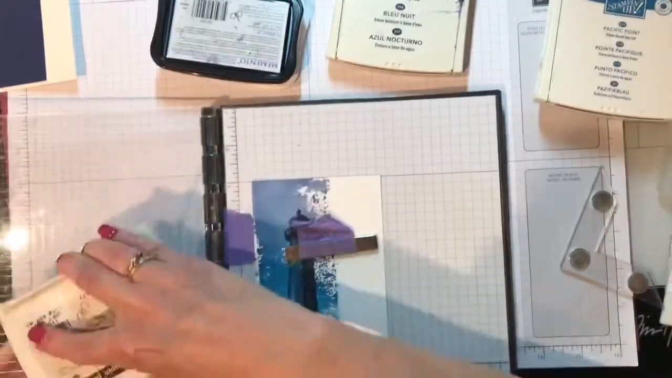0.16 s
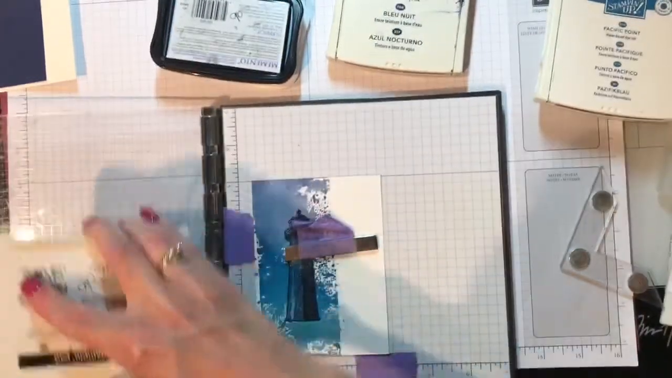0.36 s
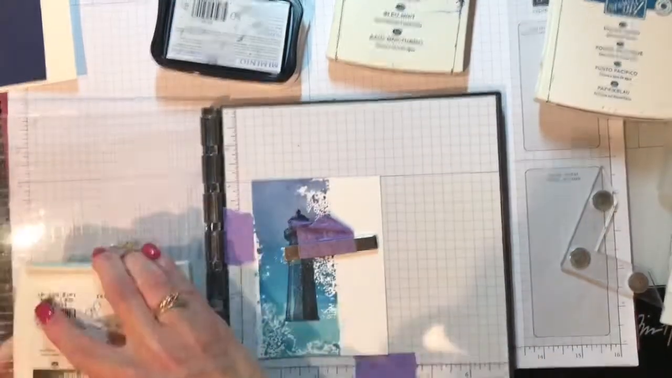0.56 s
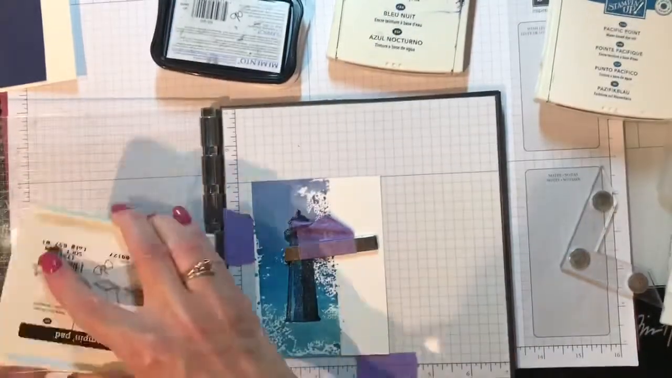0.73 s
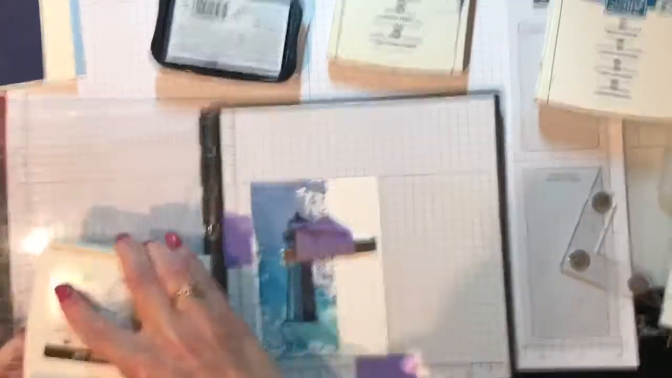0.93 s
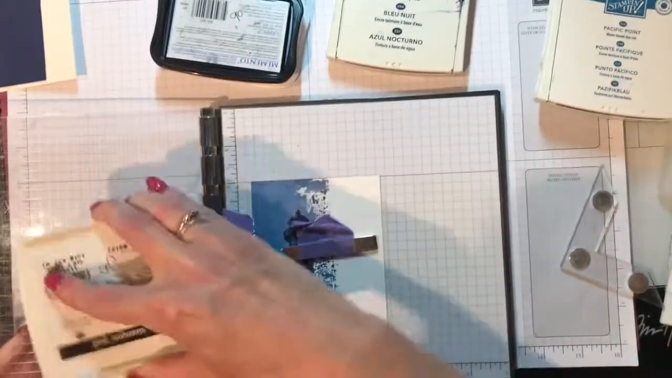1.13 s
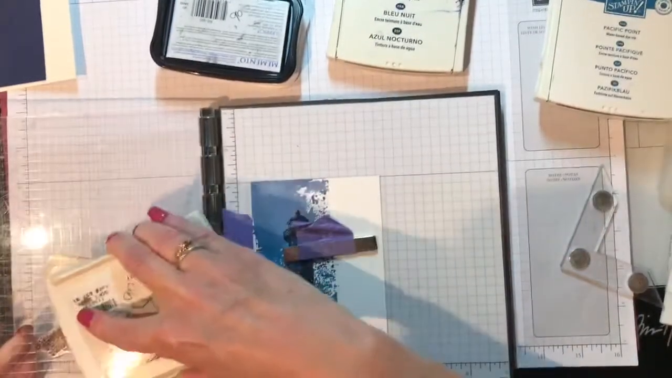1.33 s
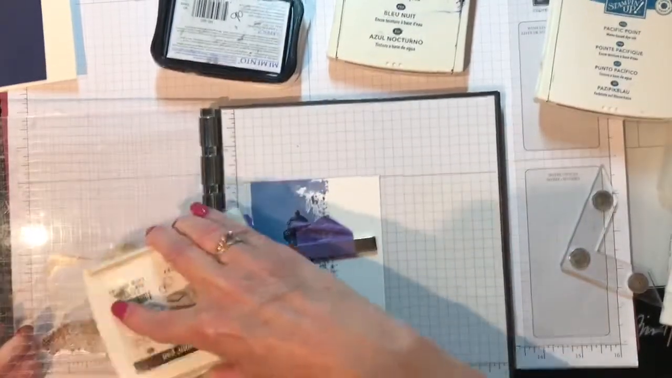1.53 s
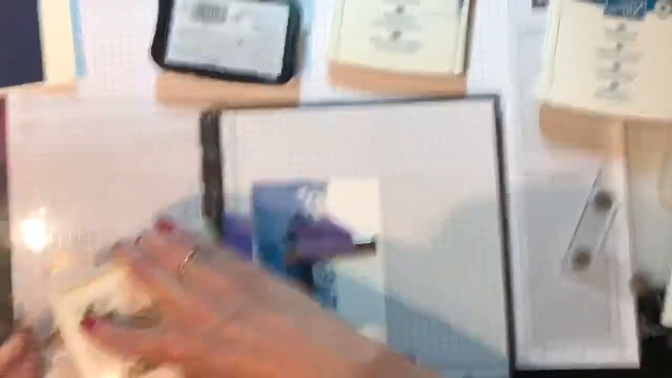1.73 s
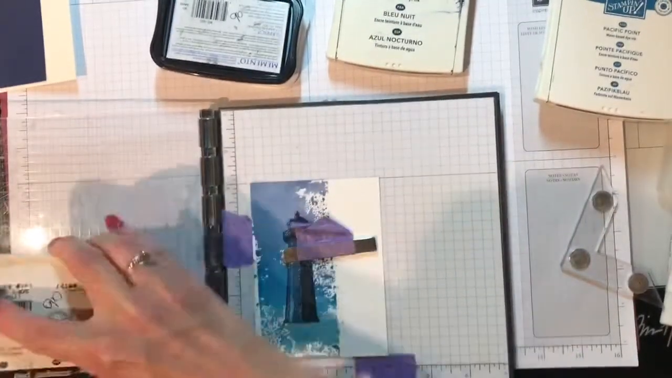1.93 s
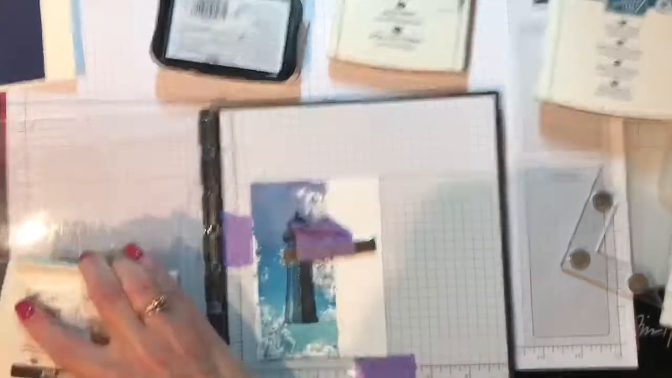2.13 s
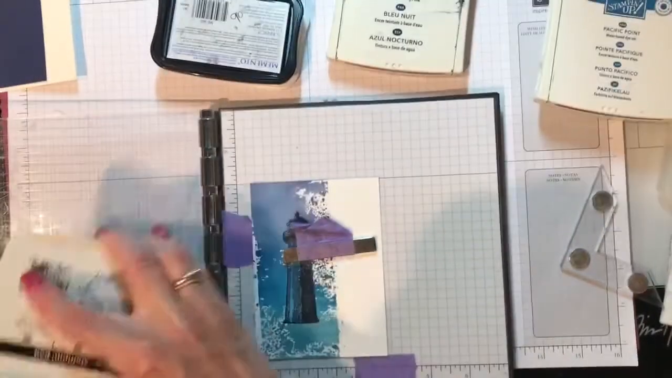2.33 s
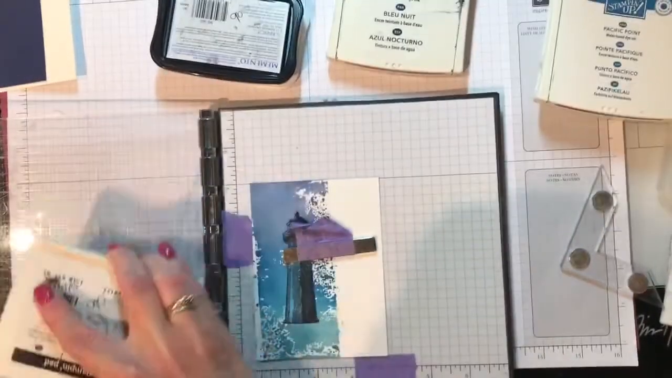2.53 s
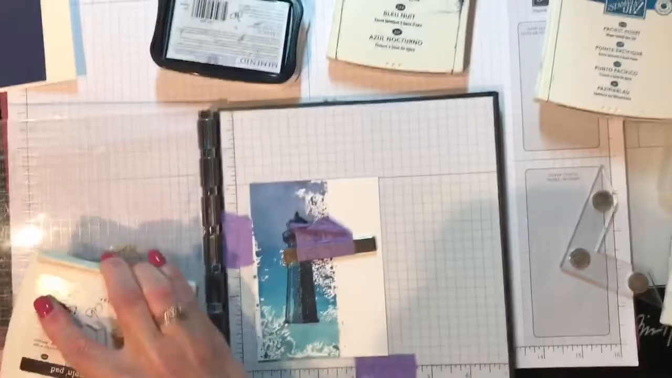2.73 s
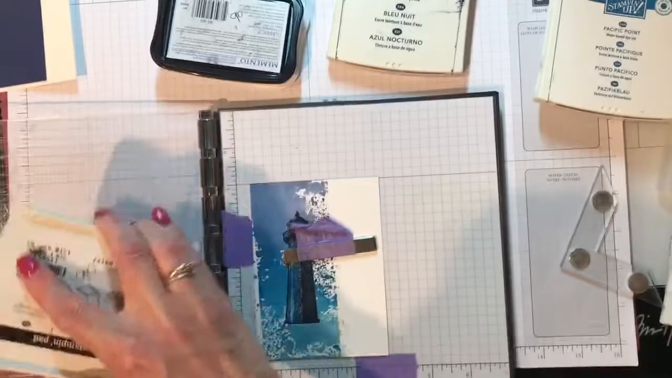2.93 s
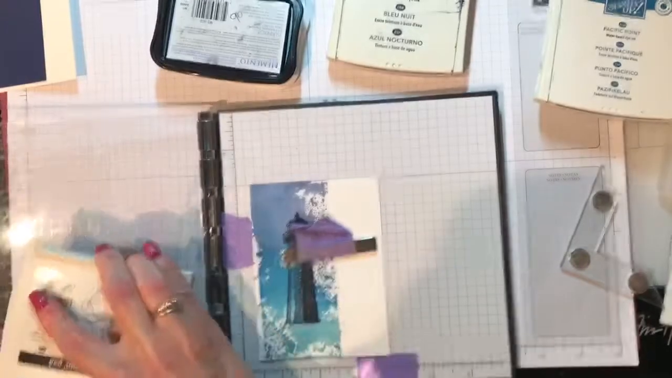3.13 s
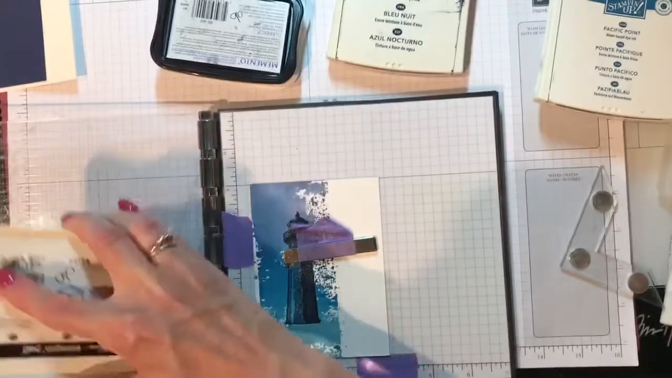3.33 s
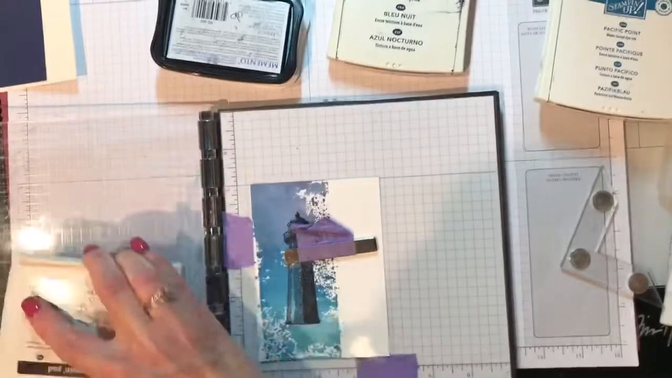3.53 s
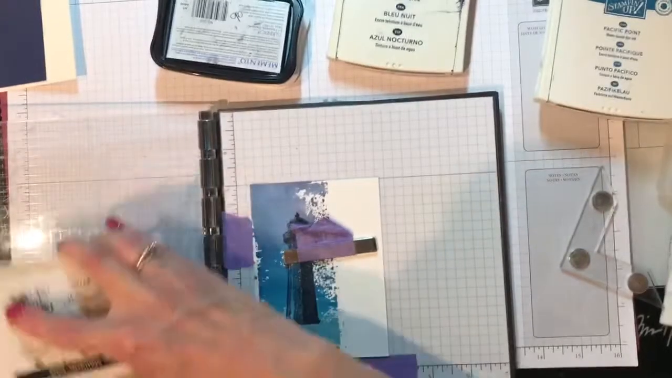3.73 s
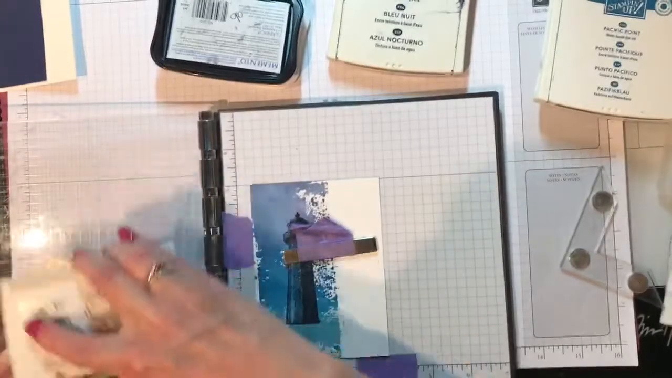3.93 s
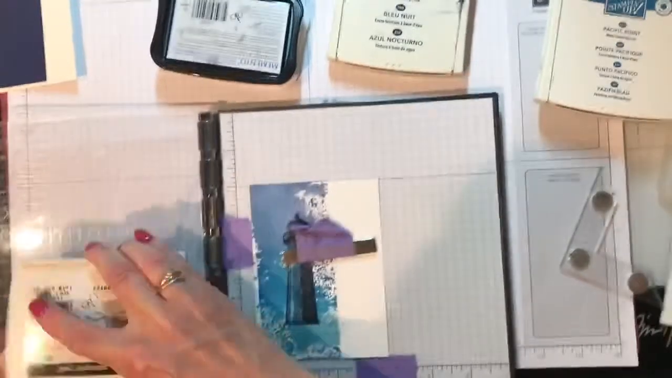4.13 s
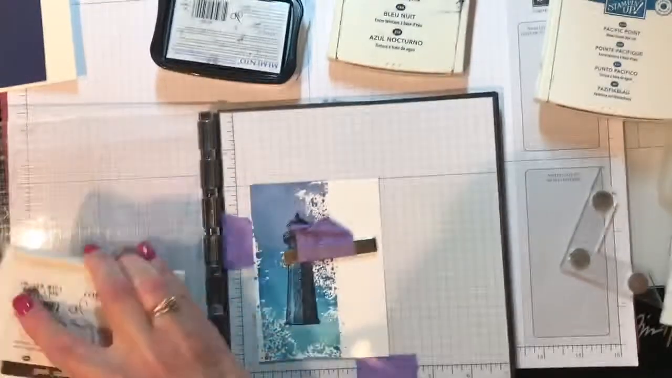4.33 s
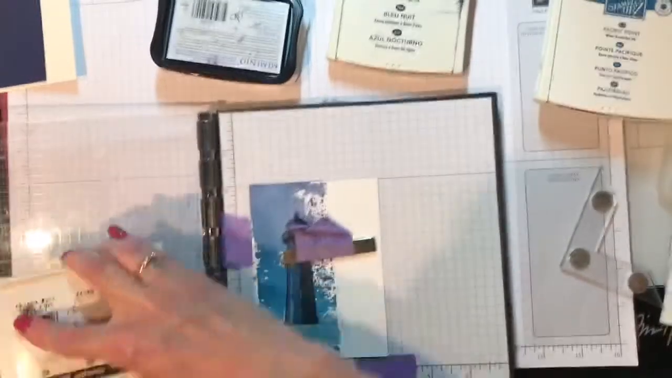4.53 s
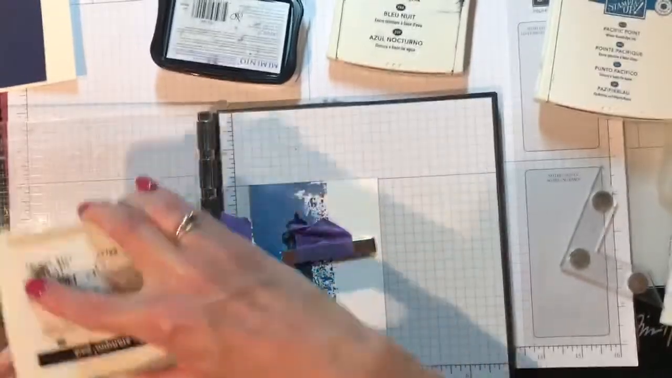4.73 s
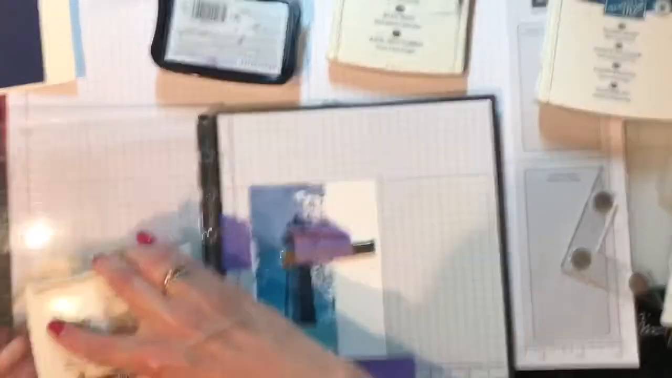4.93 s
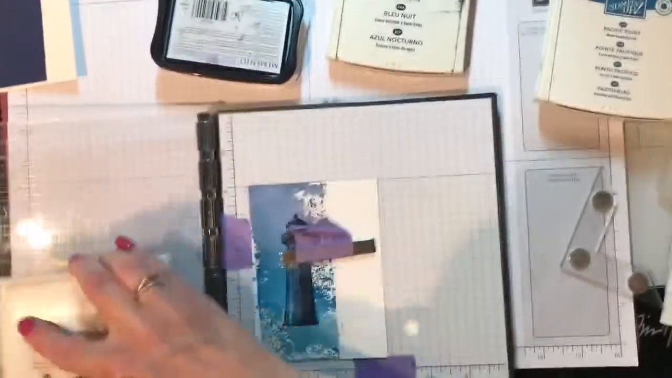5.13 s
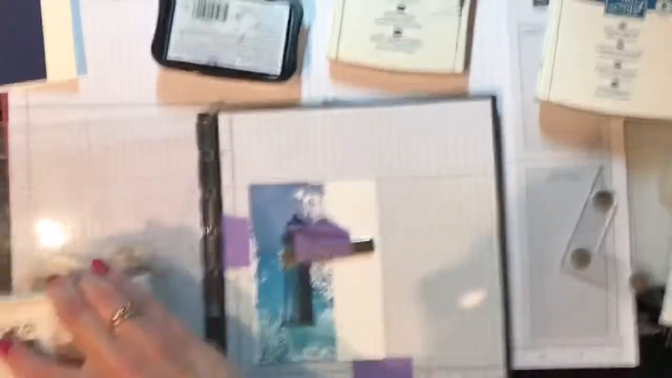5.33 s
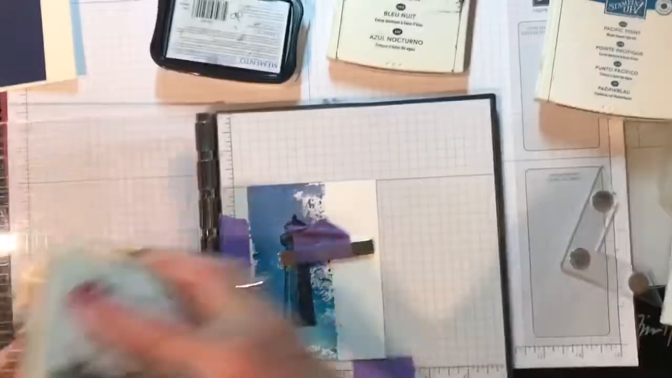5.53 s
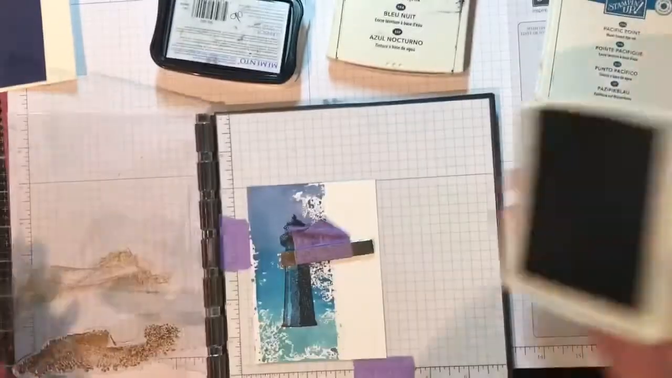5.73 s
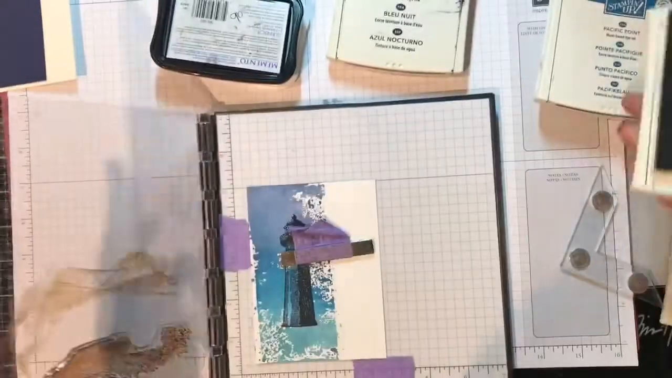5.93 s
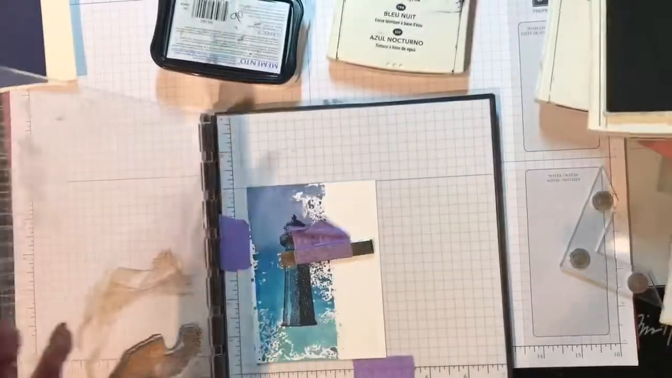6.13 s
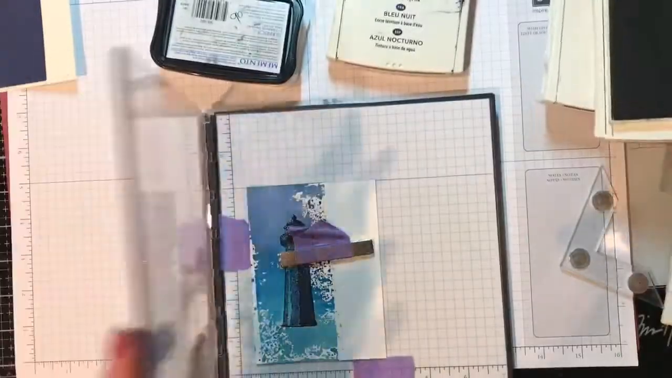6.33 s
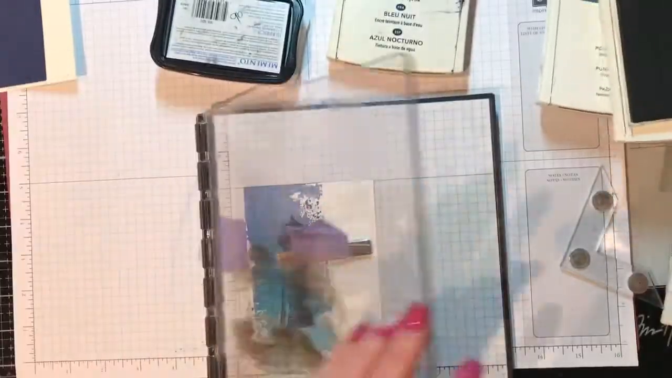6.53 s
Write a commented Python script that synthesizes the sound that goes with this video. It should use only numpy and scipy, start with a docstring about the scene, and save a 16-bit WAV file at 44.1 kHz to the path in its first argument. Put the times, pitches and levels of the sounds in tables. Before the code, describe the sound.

Dry, woody-plastic dabs of varying strength come at an irregular, brisk pace, heard from a close microphone. The loose plate chatters after each contact, the tabletop gives a soft thud and the tacky pad lets go with a tiny rough breath of noise. After the last strong hits there is near quiet with light brushing, then a knock, a smaller bright click and a dull swish. A weak wavering hum and soft air lie below.

```python
"""Ink pad dabbed on a stamp

Close on a table, a plastic ink pad is dabbed again and again onto a stamp fixed to a hinged clear plate.
Each dab rings the plate's modes, thumps the table, sends a click into a noise tail of the room and peels off
as rough noise. Short dry contacts make the loose plate tick and rattle between dabs.
Strokes of a hand and the swinging plate are grainy noise; a wavering hum and room noise lie below.
"""
import sys
import numpy as np
from scipy import signal
from scipy.fft import rfft, irfft, next_fast_len
from scipy.io import wavfile
from scipy.ndimage import uniform_filter1d

SR = 44100
rng = np.random.default_rng(int(sys.argv[2]) if len(sys.argv) > 2 else 0)


def put_to_file(sound):
    """Save the sound as 16-bit audio at rate SR, in the file named by the first command-line argument."""
    columns = np.atleast_2d(sound).T  # one column per channel
    safe = np.clip(columns, -1, 1)
    whole_steps = np.round(safe * 32767)
    wavfile.write(sys.argv[1], SR, whole_steps.astype(np.int16))


N = 289737   # length in samples

# Blows of the pad. Each row: start in seconds, peak level in dB, main plate ring in Hz, crack setting against
# the ring in dB, contact time scale in ms, table thump setting in dB, rebound against the blow in dB,
# peel setting in dB, boost of the hollow low knock in dB.
BLOWS = [(-.002, -11.5, 996, -12.5, 5.3, -34.5, -18, -35, 5.5),
         (.443, -14.5, 1280, -11.5, 2.8, -56, -16, -65, 0),
         (.454, -3.5, 1190, -7.5, 0.77, -35.5, -25, -51, 3.5),
         (.869, -9.5, 1244, -11.5, 3.2, -32, -4.5, -37, -4), (1.24, -14.5, 1140, -8, 4.1, -34, -14, -58, 0),
         (1.481, -17.5, 1318, -15.5, 2.35, -34, -31, -51.5, -2.5),
         (1.688, -16.5, 1347, -11.5, 2.66, -38.5, -21, -37, 7),
         (2.049, -11, 1220, -9, 3.54, -32.5, -33, -37.5, 3.5),
         (2.568, -14, 1300, -4.5, 2.4, -53, -19, -45.5, -10),
         (2.573, -11, 1240, -19, 0.78, -37.5, -24, -48.5, -1),
         (3.022, -8.5, 1426, -1.5, 2.75, -33.5, -12.5, -40.5, -3.5),
         (3.511, -17.5, 1077, -16.5, 3, -35.5, -23, -49.5, -3),
         (3.518, -15, 1330, -10.5, 2, -62, -28, -54.5, -15),
         (3.957, -8, 1190, -2.5, 2.7, -34, -11.5, -35.5, -2),
         (4.372, -9.5, 1227, -2.5, 3.3, -38, -15, -40, 8),
         (4.865, -11.5, 1188, -26.5, 3.06, -35, -32, -35, 1.5),
         (5.147, -2.5, 1235, -0.5, 2.36, -32, -12.5, -33, 4.5),
         (5.312, -21, 980, -11, 5, -34.5, -23, -35, 6),
         (6.112, -12, 1690, -6.5, 5.17, -44, -17, -65.5, 3.5),
         (6.287, -19, 3500, -7.5, 3, -67, -30, -64, 5)]


def amp(db):
    """Turn dB into gain."""
    return 10 ** (np.asarray(db) / 20)


def rms_one(x):
    """Scale to unit rms."""
    return x / np.sqrt(np.mean(x ** 2) + 1e-20)


def at_hz(hz, value, wanted):
    """Read a table on a log-frequency axis."""
    return np.interp(np.log(wanted), np.log(hz), value)


def ring(x, hz, t60):
    """A damped resonance: a unit click sets a sine of starting height 1 ringing for t60 seconds."""
    radius = amp(-60 / (t60 * SR))
    angle = 2 * np.pi * hz / SR
    feedback = [1, -2 * radius * np.cos(angle), radius * radius]
    return signal.lfilter([0, np.sin(angle)], feedback, x + 1e-18)


def coloured(spectrum):
    """Steady noise with the given spectrum, rms 1."""
    size = next_fast_len(N)
    hz = np.arange(size // 2 + 1) * SR / size + 1   # the 1 keeps the logarithm finite
    gain = amp(at_hz(*np.transpose(spectrum), hz))
    white = rng.standard_normal(size)
    return rms_one(irfft(rfft(white) * gain, size)[:N])


def grainy(spectrum, rough_db):
    """Friction-like coloured noise whose level jumps every few ms, with a few sharp grains; rms 1."""
    jumps = rms_one(uniform_filter1d(rng.exponential(1, N) ** 2, size=130) - 2)   # 2 is the mean
    return rms_one(amp(rough_db * jumps) * coloured(spectrum))


def add(track, sound, s):
    """Mix a sound in at a time; it may have begun before zero."""
    i = round(s * SR)
    sound = sound[max(-i, 0):len(track) - i]
    track[max(i, 0):max(i, 0) + len(sound)] += sound


def air():
    """Room noise whose rumble swells and sinks a few times a second."""
    level_db, rumble_wavers_db = -61, 3
    # Room noise. Each row: frequency in Hz, density in dB per Hz.
    air_colour = [(20, -17), (40, -2.5), (65, 4), (100, 8), (150, -16.5), (200, -6), (620, -13),
                  (1100, -12), (2500, -17), (6900, -28.5), (10400, -33), (14800, -29.5), (16500, -35)]
    noise = coloured(air_colour)
    low = signal.sosfiltfilt(signal.butter(2, 140, fs=SR, output="sos"), noise)
    smooth = uniform_filter1d(rng.standard_normal(N), size=6000)
    waver = rms_one(uniform_filter1d(smooth, size=6000))
    return amp(level_db) * (noise - low + low * amp(rumble_wavers_db * waver))


def hum():
    """A motor tone: a sine whose level and phase waver together."""
    hum_hz, level_db = 119, -60
    waver = rms_one(uniform_filter1d(rng.standard_normal(N), size=4000))
    phase = 2 * np.pi * hum_hz * np.arange(N) / SR + 0.14 * waver
    return amp(level_db + 2.5 * waver) * np.sin(phase)


def burst(crack_db):
    """What a contact throws into the room: a click, duller when the crack is weak."""
    dull = np.clip(-crack_db / 45, 0, .9)
    return (1 - dull) * dull ** np.arange(64)


def room(x):
    """The room answers with a noise tail that dies band by band."""
    # Room tail. Each row: frequency in Hz, level at the start in dB, t60 in seconds.
    room_bands = [(204, -33, 0.25), (483, -31.5, 0.24), (1370, -28, 0.43), (1810, -26.5, 0.33),
                  (2650, -26, 0.27), (5340, -27.5, 0.29), (9000, -30.5, 0.32), (15000, -31, 0.041)]
    hz, db, t60 = np.transpose(room_bands)
    t = np.arange(round(.6 * SR)) / SR
    response = np.zeros(len(t))
    edges = 100 * 2 ** np.arange(0, 7.6, .5)   # half-octave bands
    white = rng.standard_normal((2, len(t)))   # neighbouring bands use different noise
    for k, (low, high) in enumerate(zip(edges, edges[1:])):
        centre = np.sqrt(low * high)
        band_pass = signal.butter(2, [low, high], "band", fs=SR, output="sos")
        band = rms_one(signal.sosfilt(band_pass, white[k % 2]))
        response += band * amp(at_hz(hz, db, centre) - 60 * t / at_hz(hz, t60, centre))
    build_up = 1 - np.exp(-t / 0.00039)
    return signal.fftconvolve(x, response * build_up)[:N]


def resonant(x):
    """Tails and friction pass through a few fixed resonances."""
    # Fixed resonances. Each row: frequency in Hz, boost above the rest in dB, width in Hz.
    resonances = [(1010, 7, 94), (1200, 4, 90), (2480, 6, 96), (3626, 4, 160), (4345, 3.5, 150),
                  (6930, 5, 100)]
    out = x.copy()
    for hz, db, width_hz in resonances:
        r = np.exp(-np.pi * width_hz / SR)
        feedback = [1, -2 * r * np.cos(2 * np.pi * hz / SR), r * r]
        band = signal.lfilter((1 - r * r) / 2 * np.array([1, 0, -1]), feedback, x)
        out += (amp(db) - 1) * band
    return amp(-1.5) * out


def brushing():
    """Grainy friction noise: each stroke swells, holds and fades as a dull scuff and a bright rustle."""
    # Strokes of the hand and the swinging plate. Each row: seconds at full level, dull scuff setting in dB,
    # bright rustle setting in dB, rise in seconds per 20 dB, hold in seconds, fade in seconds per 20 dB;
    # rises and fades below the floors in the loop, negative ones too, take the floor.
    strokes = [(5.395, -63, -73, 1, 0.025, 4), (5.571, -66, -63, -0.3, 0.032, -0.2),
               (6.053, -83, -59.5, 0.1, 0.0092, -1.3), (6.39, -45.5, -62, -0.07, 0.032, 0.04),
               (6.479, -58, -65.5, -0.98, 0.025, .15)]
    # Dull scuff. Each row: frequency in Hz, density in dB per Hz.
    scuff_colour = [(200, -11), (600, 2), (850, 4), (1050, 1), (1500, 2), (2500, -7.5), (4500, -17.5),
                    (7000, -25.5)]
    # Bright rustle. Each row: frequency in Hz, density in dB per Hz.
    rustle_colour = [(1500, -28.5), (4000, 2), (6000, 1), (10000, -8.5), (16000, -10)]
    t = np.arange(N) / SR
    scuff, rustle = np.zeros((2, N))
    for s, scuff_db, rustle_db, rise_s, hold_s, fade_s in strokes:
        before = (s - t) / max(rise_s, 1 / 100)
        after = (t - s - hold_s) / max(fade_s, .06)
        shape = amp(-20 * np.maximum(before, after).clip(0))
        scuff += amp(scuff_db) * shape
        rustle += amp(rustle_db) * shape
    return scuff * grainy(scuff_colour, 2.0) + rustle * grainy(rustle_colour, 1.6)


def peeling():
    """A rough swell after each blow as the tacky pad lets go."""
    # The inky pad tears off the stamp: delay after the blow, rise and decay, all in seconds.
    peel_times = (0.062, 0.0041, 0.045)
    # Peel noise. Each row: frequency in Hz, density in dB per Hz.
    peel_colour = [(300, -8), (700, -1.5), (1100, -1.5), (1700, 1), (2600, 1), (4500, -8.5), (9000, -18.5),
                   (16000, -33)]
    delay, rise, decay = peel_times
    t = np.arange(round(.25 * SR)) / SR
    swell = (1 - np.exp(-t / rise)) * np.exp(-t / decay)
    level = np.zeros(N)
    for s, *_, peel_db, low_db in BLOWS:
        add(level, amp(peel_db) * swell, s + delay)
    return level * grainy(peel_colour, 2.46)


def thump(thump_db, sway_db, low_db):
    """A soft push sets the table's modes going with new strengths each time; the slow rocking comes last."""
    # Table top. Each row: frequency in Hz, relative level in dB, t60 in seconds.
    # Neighbouring rows start in opposite phase, so the low pair swells before it fades.
    table_modes = [(88.5, 1.5, 0.25), (105.5, 4, 0.18), (156, -11.5, 0.12), (243.2, -9.5, 0.28),
                   (266.8, -10.5, 0.24), (194.5, -8, 0.098), (400, -7.5, 0.08)]
    # The whole table rocks: frequency in Hz, t60 in seconds, delay in seconds.
    sway = (46, 0.35, 0.01)
    sway_hz, sway_t60, sway_delay = sway
    push, rock = np.zeros((2, round(.4 * SR)))
    add(push, amp(thump_db) * np.hanning(120) / 60, .004)
    add(rock, amp(sway_db) * np.hanning(400) / 200, sway_delay)
    luck = rng.standard_normal((len(table_modes), 2))
    out = ring(rock, sway_hz, sway_t60)
    for k, (hz, db, t60) in enumerate(table_modes):
        gain = amp(db + 2.0 * luck[k, 0] + low_db * (hz > 140))
        shifted_hz = hz * (1 + luck[k, 1] / 30)   # each mode's pitch shifts slightly at random
        out += (-1) ** k * gain * ring(push, shifted_hz, t60)
    return out


def knock(hz, crack_db, contact_ms, modes_db, t60, low_db=0):
    """A few ms of uneven micro-contacts excite the plate's main ring, its other modes and a crack; peak 1."""
    # Further modes of plate and pad case. Each row: frequency in Hz, relative level in dB, t60 in seconds.
    plate_modes = [(353, -21.5, 0.028), (647, -19, 0.03), (1019, -17, 0.14), (1758, -18, 0.031),
                   (2476, -13, 0.013), (2510, -28.5, .12), (2763, -16.5, 0.013), (3733, -19, 0.0076),
                   (4290, -23.5, 0.048), (6670, -20.5, 0.0088)]
    draw = rng.standard_normal((3, 4096))
    u = np.arange(4096) / SR / (max(contact_ms, .3) / 1000)   # time in contact lengths
    contacts = u ** 0.84 * np.exp(-u * 2.19) * draw[0]
    force = signal.lfilter([1, -1], [1, -.96], contacts)   # a small plate radiates no bass
    force = np.convolve(force, burst(crack_db))[:4096]   # a dull contact wakes the high modes less
    softer = np.clip((crack_db + 10.5) / 2, -20, 3)
    # a sharp or high contact is drier
    lasts = t60 * np.clip(-crack_db / 20, .5, 1) * min(1, 1300 / hz)
    body = rms_one(ring(ring(force, hz, lasts), hz, lasts * 0.84))
    for (mode_hz, db, mode_t60), luck in zip(plate_modes, draw[2]):
        high_db = softer * np.clip(mode_hz / 1500 - 1, 0, 1)
        hollow_db = low_db * (mode_hz < 700)
        gain = amp(db + modes_db + 2.0 * luck + high_db + hollow_db)
        body += gain * rms_one(ring(force, mode_hz, mode_t60))
    band_pass = signal.butter(1, [2500, 8000], "band", fs=SR, output="sos")
    crack = signal.sosfilt(band_pass, draw[1] * u * np.exp(-u * 1.98))
    sound = body + amp(crack_db + 2.0) * rms_one(crack)
    return sound / np.max(np.abs(sound))


def chatter():
    """After each blow the loose plate chatters at random moments, weaker the later it comes."""
    count, earliest_s, latest_s = 5, .018, .13
    level_db, fade_db = -21.5, 12   # highest level against the blow, loss by the latest moment
    ticks = []
    for row, luck in zip(BLOWS, rng.random((len(BLOWS), count, 3))):
        for late, weak, pitch in luck:
            s = row[0] + np.interp(late, [0, 1], [earliest_s, latest_s])
            db = row[1] + level_db - fade_db * late - 6 * weak
            ticks.append((s, db, 1000 * 2.3 ** pitch, -8))
    return ticks


def rattle():
    """Light ticks and the chatter after each blow: short dry contacts; the lower ones keep more bass."""
    # Clearest ticks of the loose plate and the sticky pad. Each row: start in seconds,
    # peak level before the bass cut in dB, main plate ring in Hz, crack setting against the ring in dB.
    clear_ticks = [(.167, -34.5, 1100, -6), (0.184, -20, 1210, -37.5), (0.219, -29.5, 1250, -14),
                   (0.271, -38.5, 1140, -26.5), (0.313, -44, 2400, -12), (.349, -39.5, 1020, -18),
                   (.416, -43, 1340, -31), (0.476, -25, 2550, -14.5), (.517, -33, 2620, -11),
                   (0.626, -29, 1150, -23), (0.639, -36, 1130, -25), (.648, -28, 1210, -22),
                   (.693, -21, 2400, -1.5), (0.709, -35, 1180, -24.5), (.742, -37, 2600, -5),
                   (1.028, -30, 1190, -33), (1.037, -31, 1170, -13), (1.072, -24.5, 1790, -3),
                   (1.109, -30, 1090, -30), (1.191, -37.5, 1019, -1), (1.217, -36.5, 1060, -17),
                   (1.353, -25, 1220, -21), (1.435, -35.5, 1230, -38.5), (1.506, -32, 1150, -38),
                   (1.562, -27, 1300, -16), (2.262, -31, 1380, -17), (2.29, -26.5, 1190, -16.5),
                   (2.375, -41.5, 1100, -6), (2.748, -22.5, 1216, -43), (2.786, -28, 1500, -26),
                   (2.806, -31.5, 1180, -13), (2.83, -26, 2300, -3.5), (2.855, -35, 1420, -11),
                   (2.877, -38, 1020, -4), (3.252, -31.5, 1200, -20), (3.266, -26, 1214, -31),
                   (3.329, -34, 1160, -33), (3.696, -35, 1235, -23.5), (3.722, -26, 1265, -30),
                   (3.784, -28.5, 1070, -35.5), (3.876, -39.5, 1240, -12), (4.116, -27, 1340, -1),
                   (4.144, -34.5, 1000, -18), (4.159, -29.5, 1230, -17), (4.169, -27.5, 1040, -26),
                   (4.196, -34.5, 1250, -37), (4.514, -33.5, 1320, -25), (4.535, -32.5, 990, -14.5),
                   (4.552, -33.5, 1300, -12), (4.624, -38.5, 1164, -20), (4.984, -27.5, 1130, -18),
                   (5.116, -33, 1100, -19), (5.187, -19.5, 1320, -6), (5.569, -39, 1330, 1.5),
                   (5.633, -43, 1340, 1), (5.792, -52.5, 1020, -9), (5.94, -46.5, 1770, -6),
                   (6.042, -40, 1350, 0), (6.33, -28.5, 1400, -7), (6.336, -30.5, 1730, -9)]
    # a light touch is short, cracks less and moves no bass; the pad damps its main ring
    contact_ms, less_crack_db, t60_s, room_db = 1.6, -7.5, 0.009, -6
    out, sent = np.zeros((2, N))
    for s, db, hz, crack_db in clear_ticks + chatter():
        tick = knock(hz, crack_db + less_crack_db, contact_ms, 2.5, t60_s)
        cut_hz = 880 * min(hz / 1130, 1) ** 5.1
        bass_cut = signal.butter(4, cut_hz, "high", fs=SR, output="sos")
        add(out, amp(db) * signal.sosfilt(bass_cut, tick), s)
        add(sent, amp(db + room_db) * burst(crack_db), s)
    return out, sent


def dabs():
    """Hard blows and rebounds on the plate, table thumps, and each blow's share for the room."""
    ring_t60_s, rebound_s = 0.013, 0.011   # t60 before the contact shortens it, delay of the rebound
    room_db, room_db_per_ms = -10.5, 2   # a longer contact sends more to the room
    sway_base_db, sway_follows = -18.5, 0.6093   # a firm press both peels loudly and rocks the table
    plate, sent, table = np.zeros((3, N))
    for s, db, hz, crack_db, contact_ms, thump_db, rebound_db, peel_db, low_db in BLOWS:
        blow = knock(hz, crack_db, contact_ms, 0.063, ring_t60_s, low_db)
        add(plate, amp(db) * blow, s)
        # the rebound is lighter, so its ring is higher
        rebound = knock(1.4 * hz, crack_db - 0.5, contact_ms, 1.3, ring_t60_s)
        add(plate, amp(db + rebound_db) * rebound, s + rebound_s)
        sent_db = db + room_db + room_db_per_ms * contact_ms
        add(sent, amp(sent_db) * burst(crack_db), max(s, 0))
        add(table, thump(thump_db, sway_base_db + sway_follows * peel_db, low_db), s)
    return plate, sent, table


def scene():
    """Knocks and ticks with room, over table, peel, hand, hum and air."""
    plate, sent, table = dabs()
    ticks, ticks_sent = rattle()
    tail = room(sent + ticks_sent)
    lingering = resonant(tail + peeling() + brushing())
    return (plate + ticks + lingering + table + hum() + air())[None]


def record(dry):
    """The microphone drops the deep bass below 36 Hz; the top is cut steeply, 50 dB down by 16.9 kHz."""
    thin = signal.sosfilt(signal.butter(3, 36, "high", fs=SR, output="sos"), dry)
    return signal.sosfilt(signal.cheby2(12, 50, 16900, fs=SR, output="sos"), thin)


dry = scene()
out = record(dry)
put_to_file(out)
```